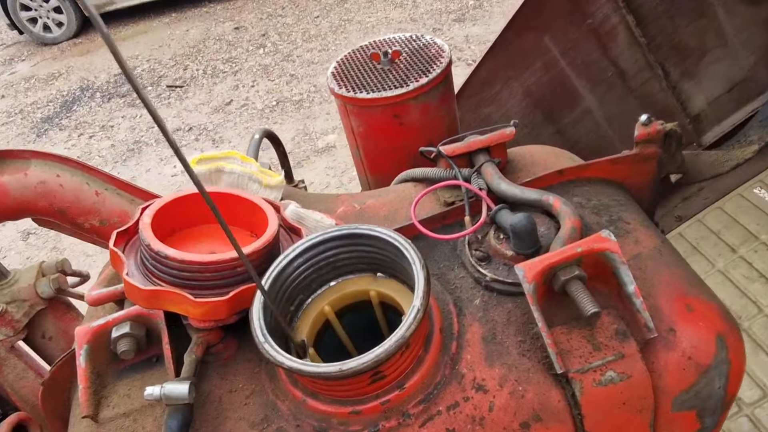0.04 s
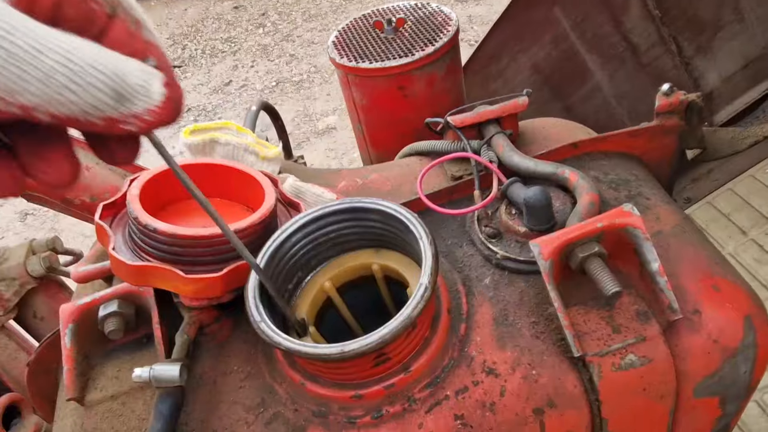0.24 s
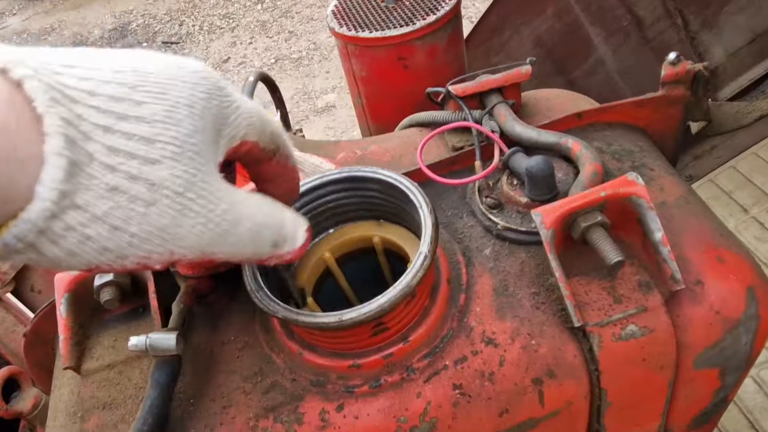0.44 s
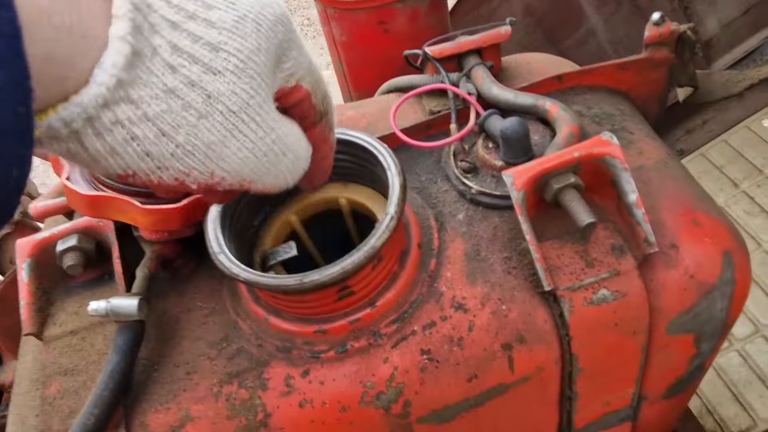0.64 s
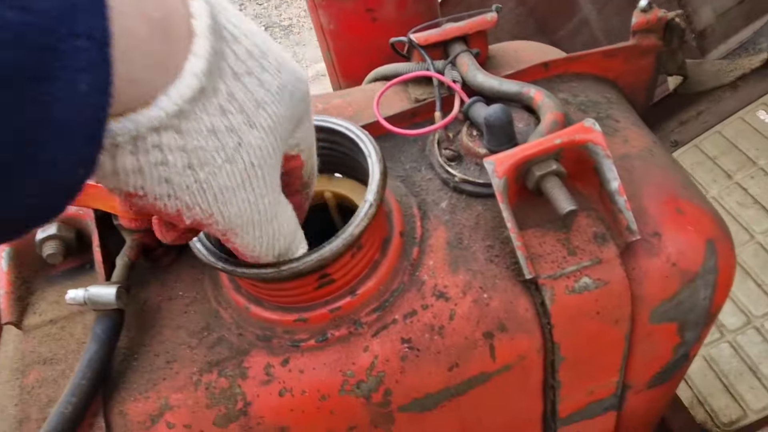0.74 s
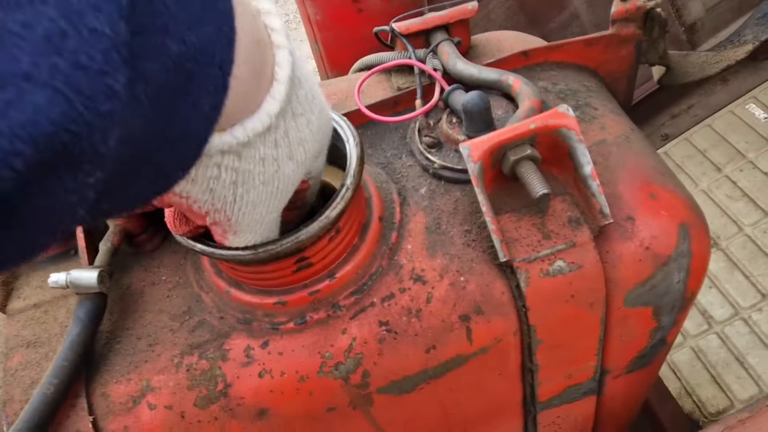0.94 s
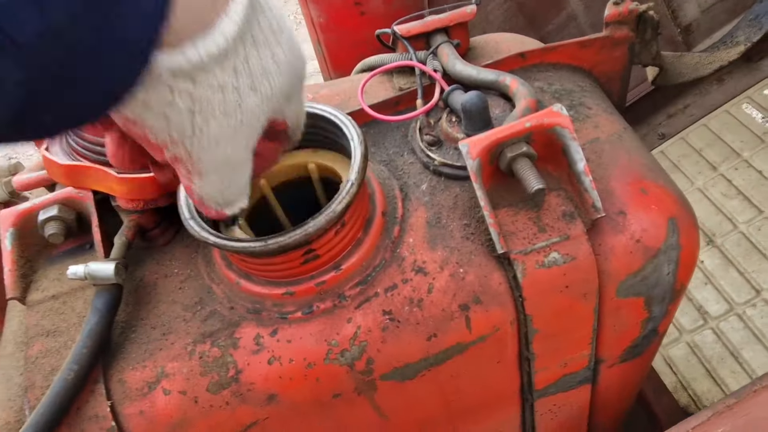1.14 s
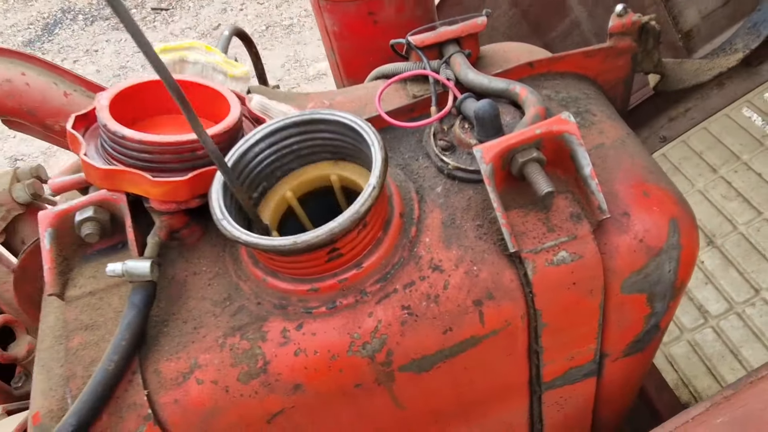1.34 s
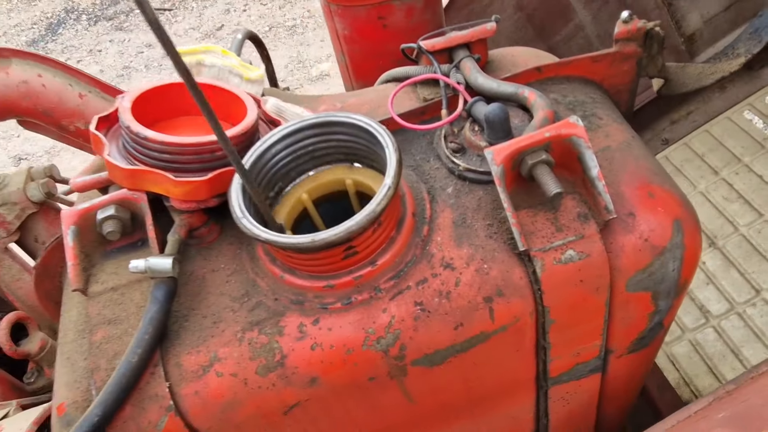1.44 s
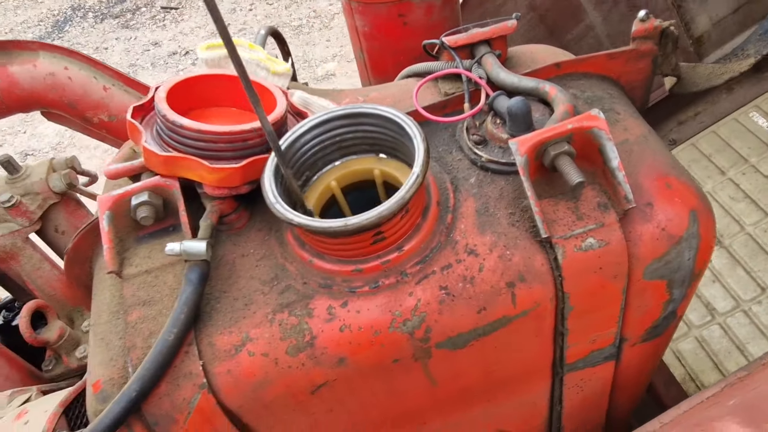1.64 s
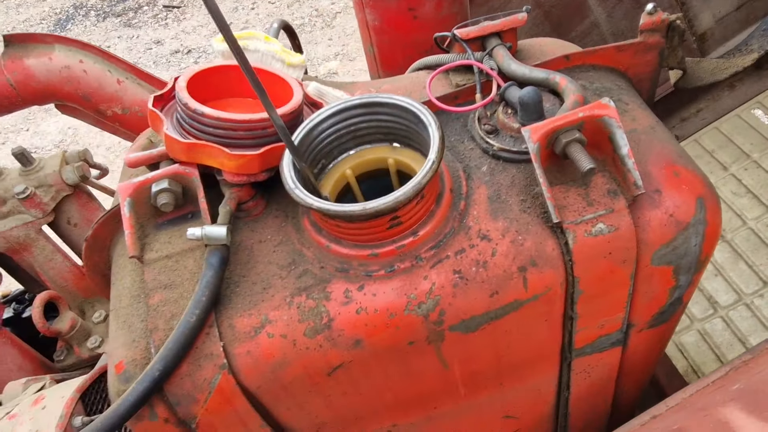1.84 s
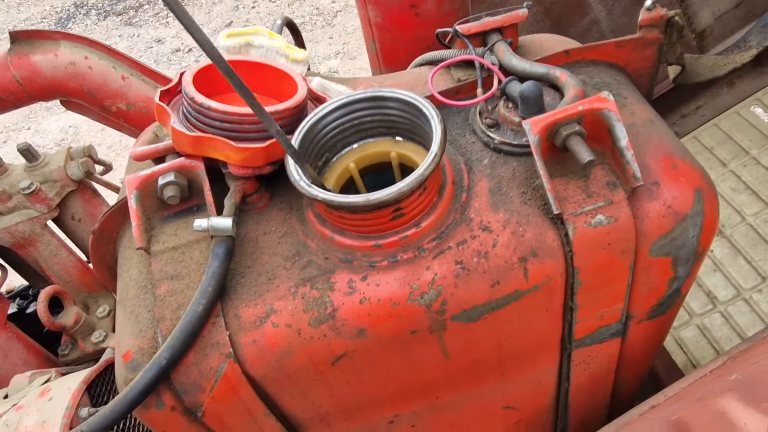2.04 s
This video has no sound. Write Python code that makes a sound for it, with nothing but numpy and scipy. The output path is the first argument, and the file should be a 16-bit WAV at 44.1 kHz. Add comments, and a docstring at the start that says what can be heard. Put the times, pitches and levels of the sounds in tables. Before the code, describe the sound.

Close stereo outdoors: a metal rod rattles and grates down a steel fuel tank neck, bangs so the tank resonates, is scraped upward with a snag, then chatters on the rim over a distant low hum.

```python
"""A thin steel rod goes down the filler neck of a steel fuel tank, in close stereo: it clinks on the rim,
scrapes, and strikes so that the tank booms; drawn up, it catches once, then clinks and chatters at the neck.
Blows and clinks are decaying modes and noise bursts; the scrapes are dense stick-slip impulses through
resonances, with a tank drone. A distant engine, two unsteady tones, hums underneath in the outdoor air."""
import sys
import numpy as np
from scipy import signal
from scipy.fft import rfft, irfft, next_fast_len
from scipy.io import wavfile
from scipy.ndimage import map_coordinates

SR = 44100
rng = np.random.default_rng(int(sys.argv[2]) if len(sys.argv) > 2 else 0)


def generate_wav(sig):
    """Save sig (samples, or channels by samples) to the path in sys.argv[1] as 16-bit PCM at SR."""
    pcm = np.round(np.clip(np.atleast_2d(sig).T, -1, 1) * 32767).astype(np.int16)
    wavfile.write(sys.argv[1], SR, pcm)


N = 92610

# Ringing modes of the rod. Each row: frequency in Hz, relative level in dB.
ROD_MODES = [(1325, -8.5), (2420, -6), (2730, -23.5), (3180, -11.5), (4264, -0.5), (5080, -0.5),
             (6390, 2.5), (7070, -27), (7300, -7.5), (7870, -8.5), (8300, -6), (8610, -10), (9400, -9),
             (10070, -4), (11830, -7), (12700, -8), (13570, -20), (13800, -11), (14560, -9.5),
             (15420, -18.5)]
# Drawing the rod up. Each row: time in seconds, scrape in dB before the stroke's gains, tank drone in dB.
UP_STROKE = [(0.78, -72, -49), (0.92, -45.5, -43), (0.964, -52.5, -52), (0.99, -38.5, -36),
             (1.08, -44.5, -38.5), (1.21, -49.5, -45), (1.39, -52, -50), (1.44, -57, -55.5),
             (1.5, -75.5, -59.5)]


def amp(db):
    """Decibels to gain."""
    return 10 ** (np.asarray(db) / 20)


def unit(x):
    """Scale to rms 1."""
    return x / np.sqrt(np.mean(x ** 2) + 1e-20)


def along(points, hz):
    """Read (Hz, value) points at hz, on a log frequency axis."""
    f, v = np.transpose(points)
    return np.interp(np.log(hz + 1), np.log(f + 1), v)


def gains(rows):
    """One gain per sample for each dB column, falling 500 dB a second outside the rows."""
    s, *columns = np.transpose(rows)
    t = np.arange(N) / SR
    outside_db = 500 * np.abs(t - np.clip(t, s[0], s[-1]))
    return [amp(np.interp(t, s, column) - outside_db) for column in columns]


def filtered(x, response):
    """Multiply the spectrum of x by a response of frequency."""
    m = next_fast_len(N + SR // 2)
    return irfft(rfft(x, m) * response(np.fft.rfftfreq(m, 1 / SR)), m)[..., :N]


def noise(colour):
    """Stereo noise of rms 1, alike in the bass and unrelated in the treble."""
    # Each row: frequency in Hz, correlation between left and right.
    likeness = [(100, 0.99), (300, 0.95), (600, 0.88), (1200, 0.22), (3000, 0)]

    def mid_side(hz):
        angle = np.arccos(np.clip(along(likeness, hz), -1, 1)) / 2
        return amp(along(colour, hz)) * [np.cos(angle), np.sin(angle)]

    mid, side = filtered(rng.standard_normal((2, N)), mid_side)
    return unit(np.array([mid + side, mid - side]))


def fade(t60, attack_s=0.0001):
    """A fast rise and an exponential decay of 60 dB in t60 seconds."""
    t = np.arange(N) / SR
    return np.exp(-np.log(1000) * t / t60) * (1 - np.exp(-t / attack_s))


def add(out, s, x):
    """Mix x in from time s."""
    i = max(0, round(s * SR))
    out[:, i:] += x[:, :N - i]


def wobble(rate):
    """A smooth random curve, rate knots a second."""
    return map_coordinates(rng.standard_normal(2000), [np.arange(N) * rate / SR], mode="mirror")


def resonate(x, modes, width_hz, lowest_hz=9000):
    """Pass x through modes widened by the contact, which damps those under lowest_hz."""
    def response(f):
        power = 0
        for hz, db in modes:
            damping = 1 + (lowest_hz / hz) ** 8
            power = power + amp(2 * db) / damping / (1 + ((f - hz) / width_hz) ** 2) ** 2
        return np.sqrt(power)

    return filtered(x, response)


def steel(x):
    """Colour x with a crowd of small, irregularly spaced resonances, to rms 1."""
    ripple_db, spacing_hz = 5, 34

    def bumps(hz):
        return map_coordinates(rng.standard_normal(2000), [hz / spacing_hz], mode="mirror")

    return unit(filtered(x, lambda hz: amp(ripple_db * np.array([bumps(hz), bumps(hz)]))))


def slips(per_s=1900):
    """A dense train of tiny stick-slip impulses of uneven size."""
    sizes = amp(np.clip(rng.standard_normal(N), -2, 2))  # about 1 dB of spread
    return unit((rng.random(N) < per_s / SR) * sizes * rng.standard_normal(N))


def rasp(grit, per_s, patchy_db=2):
    """Three contact points slip, each with its own ring and changing pressure."""
    total = 0
    for _ in range(3):
        grain = (noise(grit) * fade(.007))[:, :SR // 20]
        scrape = signal.fftconvolve(slips(per_s)[None], grain, axes=1)[:, :N]
        total = total + steel(scrape) * amp(patchy_db * wobble(14.9))
    return unit(total)


def hum(waver_rad=0.22):
    """A distant engine's slightly unsteady tones over the outdoor air."""
    # Each row: tone in Hz, rms level in dB.
    tones = [(45, -59.5), (88, -59)]
    # Each row: frequency in Hz, relative level of the air noise in dB.
    air_colour = [(20, -23), (45, -8), (85, 4.5), (160, -12.5), (350, -24), (600, -32), (1400, -27.5),
                  (7000, -35.5), (15000, -60.5)]
    t = np.arange(N) / SR
    out = amp(-54.5) * noise(air_colour)
    for hz, db in tones:
        phase = 2 * np.pi * hz * t + waver_rad * wobble(12)
        out = out + amp(db) * np.sqrt(2) * np.sin(phase)
    return out


def rub():
    """The raised rod leans on the neck and rubs faintly."""
    # Each row: time in seconds, level in dB.
    pressure = [(1.48, -61.5), (1.58, -52), (1.7, -58), (1.87, -57.5), (2.02, -59), (2.1, -62)]
    # Each row: frequency in Hz, relative level in dB.
    rub_colour = [(200, -30.5), (345, 5), (450, -10), (1600, -3.5), (2700, -16.5), (5500, -19.5),
                  (12000, -43.5)]
    return gains(pressure)[0] * noise(rub_colour)


def ticks():
    """Short snags of the rod on the thread of the neck, each a decaying noise burst."""
    # Each row: start in seconds, level in dB.
    snags = [(0.352, -44), (0.3805, -33.5), (0.3865, -37), (0.481, -47.5), (0.51, -39.5), (0.977, -28.5),
             (1.3213, -37.5), (1.3317, -36.5), (1.376, -42)]
    colour = [(300, -35.0), (1500, -12), (6500, 13.5), (15000, -11.5)]  # (Hz, relative dB)
    out = np.zeros((2, N))
    for s, db in snags:
        add(out, s, amp(db) * noise(colour) * fade(.035))
    return out


def cavity(hz=126, db=-1, swing_db=3):
    """While the rod is drawn up it keeps a low tank tone sounding, unsteady in level and phase."""
    phase = 2 * np.pi * hz * np.arange(N) / SR + .5 * wobble(10.4)
    level = amp(db + swing_db * wobble(10.32)) * gains(UP_STROKE)[1]
    return level * np.sqrt(2) * np.sin(phase)


def grip():
    """The glove takes hold of the rod and drags it along the neck in coarse slips."""
    # Each row: time in seconds, level in dB.
    drag = [(0.695, -65), (0.716, -55), (0.754, -63), (0.81, -55), (0.855, -44.5), (0.926, -44.5),
            (0.97, -42.5), (1.03, -45.5)]
    # Each row: frequency in Hz, relative level in dB.
    drag_colour = [(250, 10.5), (620, 17), (1000, -34.5), (1800, 6.5), (2250, 14.5), (3500, 3),
                   (3900, -15.5), (5300, 10.5), (7000, -8.5), (9800, 0.5), (12000, -18), (15500, -7.5)]
    return gains(drag)[0] * rasp(drag_colour, per_s=580)


def stroke(curve, grit, grit_db, sing_db, width_hz, per_s=700, groups=5):
    """Slips excite grit and the rod's upper modes, which come and go, and set the tank droning."""
    # Each row: frequency in Hz, relative level of the drone in dB.
    drone_colour = [(30, -33), (70, -8), (126, -3), (150, -1.5), (220, 1.5), (370, -9), (500, -19),
                    (1500, -20.5), (4000, -71.5)]
    sing_swing_db, judder_db = 4, 2.2
    scrape, drone = gains(curve)
    sing = 0
    for k in range(groups):  # each group of modes swells on its own
        ringing = resonate(np.array([slips(), slips()]), ROD_MODES[k::groups], width_hz)
        sing = sing + ringing * amp(sing_swing_db * wobble(14.9))
    gritty = amp(grit_db + judder_db * wobble(50.98)) * rasp(grit, per_s)
    return scrape * (gritty + amp(sing_db) * unit(sing)) + drone * noise(drone_colour)


def stroke_down():
    """The rod slides down the neck: more grit than singing modes."""
    # Each row: time in seconds, scrape in dB before the stroke's gains, tank drone in dB.
    down_stroke = [(0, -44.5, -35), (0.06, -56, -44.5), (0.13, -48, -41.5), (0.19, -59.5, -50),
                   (0.238, -47.5, -34), (0.25, -35.5, -28), (0.34, -43, -29.5), (0.41, -44.5, -28),
                   (0.5, -56, -38), (0.6, -74.5, -46.5), (0.76, -105.5, -50.5)]
    # Each row: frequency in Hz, relative level in dB.
    down_grit = [(300, -32), (800, -15), (1400, -2.5), (1900, -23), (2300, 4), (3200, -9.5), (4200, -9),
                 (9000, -13.5), (15500, -14.5)]
    return stroke(down_stroke, down_grit, grit_db=7.0, sing_db=-6.5, width_hz=90)


def stroke_up():
    """The rod is drawn up the neck: its modes sing closer to the level of the grit."""
    # Each row: frequency in Hz, relative level in dB.
    up_grit = [(300, -11.5), (550, -14.5), (1500, -2), (3200, -6), (4000, -9), (5500, -4.5), (9500, -5.5),
               (15500, -12)]
    return stroke(UP_STROKE, up_grit, grit_db=3.5, sing_db=1, width_hz=95)


def chatter(length_s, mean_gap_s=.002, rebound_db=-9):
    """One firm contact, then uneven rebounds that die out after length_s; energy 1."""
    t = np.arange(N) / SR
    hits = rng.random(N) < 1 / (mean_gap_s * SR)
    contacts = hits * rng.standard_normal(N) * amp(rebound_db) * np.exp(-(t / length_s) ** 4)
    contacts[0] = 1
    return contacts / np.linalg.norm(contacts)


def clinks():
    """Each contact on the rim taps and rings the rod's bending modes and the neck; the free length rings on."""
    # Each row: start in seconds, level in dB, treble tilt in dB per octave, chatter length in seconds.
    rim_contacts = [(0.084, -32, -1.5, 0.026), (0.116, -47.5, 1.5, 0.012), (1.7312, -30, 1.5, 0.015),
                    (1.8007, -35.5, -1, 0.018), (1.825, -44.5, -1, 0.04), (1.856, -40, -3, 0.027)]
    # Each row: frequency in Hz, relative level of the neck in dB.
    neck_colour = [(300, -24), (820, -1.5), (1020, -6.5), (1330, 2.5), (1950, -11), (2600, 1), (3800, -8.5),
                   (5000, -7), (9000, -12.5), (15500, -15.5)]
    # The free length of the rod. Each row: frequency in Hz, relative level in dB.
    free_modes = [(5720, 12.5), (8570, 13.5), (11710, 3)]
    ring_db, buzz_db, neck_db, tap_db, free_db = -6, -2, -3, 0, -28
    ring_t60_s, damping = 0.18, 0.6  # at 4000 Hz; how fast higher modes die sooner
    t = np.arange(N) / SR
    neck_fade = amp(neck_db) * fade(0.3) + amp(tap_db) * fade(0.019)

    def sine(hz):
        return np.sin(2 * np.pi * (hz * t + rng.random((2, 1))))

    out = np.zeros((2, N))
    for s, db, tilt_db, length_s in rim_contacts:
        def tilted(points):
            return [(hz, level + tilt_db * np.log2(hz)) for hz, level in points]

        modes = tilted(ROD_MODES)
        ring = sum(amp(level) * sine(hz) * fade(ring_t60_s * (4000 / hz) ** damping)
                   for hz, level in modes)
        ring = ring / np.std(ring[:, :SR // 20])
        neck = steel(noise(tilted(neck_colour))) * neck_fade
        free = sum(amp(level) * sine(hz) for hz, level in free_modes) * fade(.6)
        # modes blurred by the contact
        blurred = resonate(rng.standard_normal((2, N)), modes, width_hz=60, lowest_hz=944)
        buzz = unit(blurred) * fade(0.18)
        contact = amp(ring_db) * ring + amp(buzz_db) * buzz + neck + amp(free_db) * free
        clink = signal.fftconvolve(chatter(length_s)[None], contact, axes=1)[:, :N]
        add(out, s, amp(db) * clink)
    return out


def tank_boom():
    """The tank's modes ring together, the higher ones dying sooner; rms 1 over the first 50 ms."""
    # Each row: mode in Hz, relative level in dB.
    tank_modes = [(106, -40), (125, -36.5), (162, -38), (209, -29), (265, -27.5), (302, -41), (334, -37),
                  (387, -35.5), (412, -39.5), (506, -47), (571, -46.5), (637, -37.5), (753, -35.5),
                  (799, -39), (924, -39), (1053, -47.5), (1190, -59.5), (1425, -45)]
    t60_s, damping = 0.55, 0.14  # at 200 Hz; how fast higher modes die sooner
    t = np.arange(N) / SR
    boom = np.zeros(N)
    for k, (hz, db) in enumerate(tank_modes):
        decay = fade(t60_s * (200 / hz) ** damping, attack_s=0.00225)
        boom += (-1) ** k * amp(db) * np.sin(2 * np.pi * hz * t) * decay
    return boom / np.std(boom[:SR // 20])


def soften(x, bright_hz):
    """Two equal one-pole low-passes: softer blows are duller."""
    return filtered(x, lambda hz: 1 / (1 + 1j * hz / bright_hz) ** 2)


def knocks():
    """Each blow on the tank cracks, thuds and rattles the sheet steel, and booms; the rod shivers on."""
    # Each row: start in seconds, levels of boom, crack and sheet rattle in dB, low-pass corner in Hz.
    blows = [(0.2423, -17.5, -10.5, -12, 15500), (0.263, -30.5, -29, -17.5, 1480),
             (0.2869, -39, -28, -27, 900), (0.512, -34.5, -25, -50.5, 414), (0.57, -32, -63, -59, 229),
             (0.9805, -40, -19.5, -33.5, 3840), (0.987, -62, -22, -34, 1966)]
    # Each row: frequency in Hz, relative level of the sheet rattle in dB.
    sheet_colour = [(30, -28), (150, -41.5), (280, 16.5), (600, 10), (1000, 3), (1400, -14), (2000, -45.5),
                    (15000, -55.5)]
    # Each row: frequency in Hz, relative level of the crack in dB.
    crack_colour = [(100, 10.5), (500, -14.5), (1400, 7), (1900, -3), (2600, 1.5), (4000, -4), (7500, 6.5),
                    (15500, 1.5)]
    t = np.arange(N) / SR
    boom = tank_boom()
    thud = -amp(12) * np.sin(2 * np.pi * 400 * t) * fade(.02, attack_s=0.0037)
    shiver_tone = amp(-4) * np.sin(2 * np.pi * 12495 * t)  # the shiver's one clear tone
    crack_fade = fade(.022) + amp(-14) * fade(0.19)  # the crack, then the shiver
    out = np.zeros((2, N))
    for s, boom_db, crack_db, sheet_db, bright_hz in blows:
        crack = unit(soften(noise(crack_colour) + shiver_tone, bright_hz)) * crack_fade
        rattle = noise(sheet_colour) * fade(0.15, attack_s=.0006)
        body = amp(boom_db) * boom + amp(sheet_db) * (thud + rattle)
        add(out, s, soften(body, bright_hz) + amp(crack_db) * crack)
    return out


def scene():
    """All sources at the two microphones."""
    background = hum() + rub() + ticks()
    sliding = cavity() + grip() + stroke_down() + stroke_up()
    return background + sliding + clinks() + knocks()


def record(dry):
    """Each microphone has its own colour, the left hears first; nothing is kept above the band limit."""
    balance = [(60, -0.5), (300, 1.3), (1200, 2), (2200, -4.5), (3200, 10), (4500, -5),
               (6500, 0), (9000, -3.0), (14000, 0)]  # (Hz, left over right dB)
    lead_s, top_hz = .00006, 15900
    side = np.array([[.5], [-.5]])  # half the difference to each microphone

    def microphones(hz):
        return amp(side * along(balance, hz)) * np.exp(2j * np.pi * hz * side * lead_s)

    return filtered(filtered(dry, microphones), lambda hz: hz < top_hz)


dry = scene()
out = record(dry)
generate_wav(out)
```